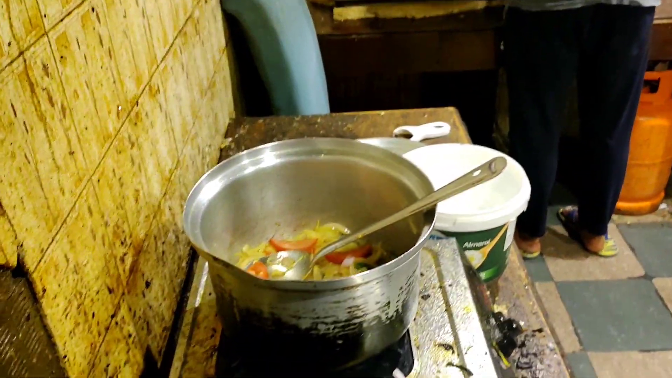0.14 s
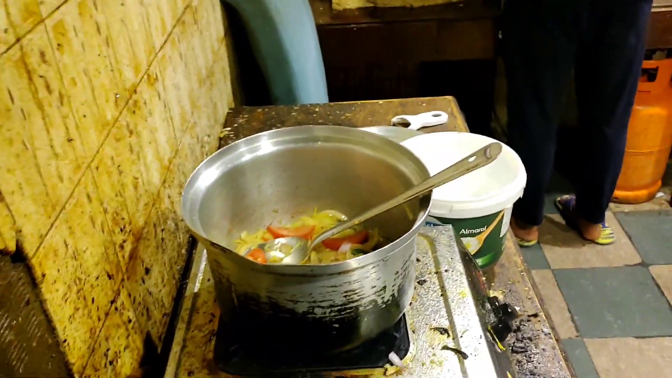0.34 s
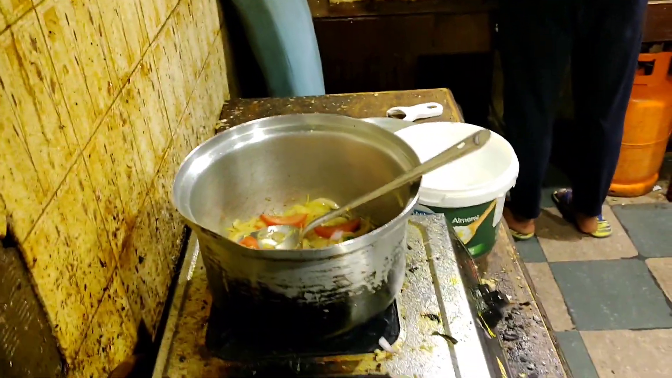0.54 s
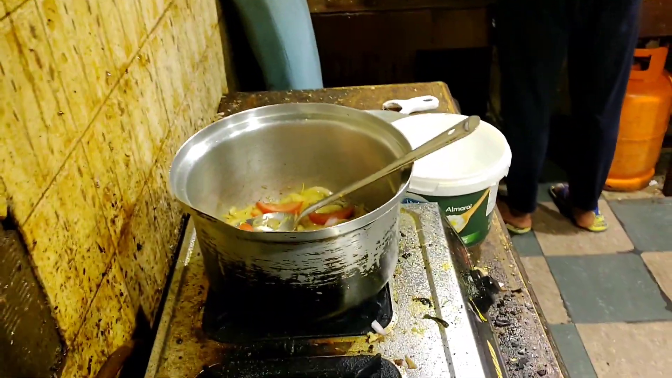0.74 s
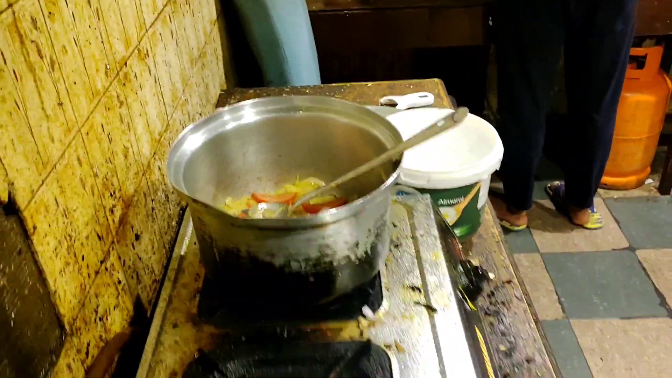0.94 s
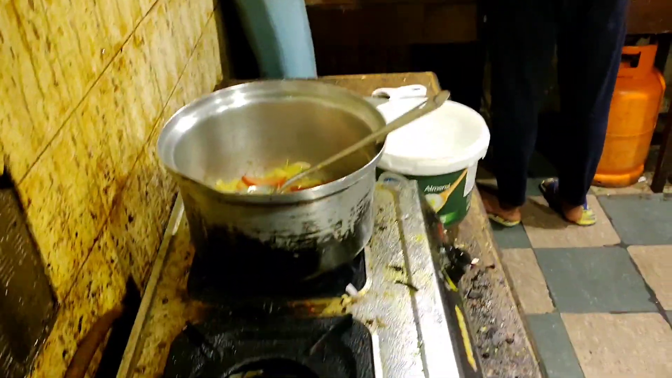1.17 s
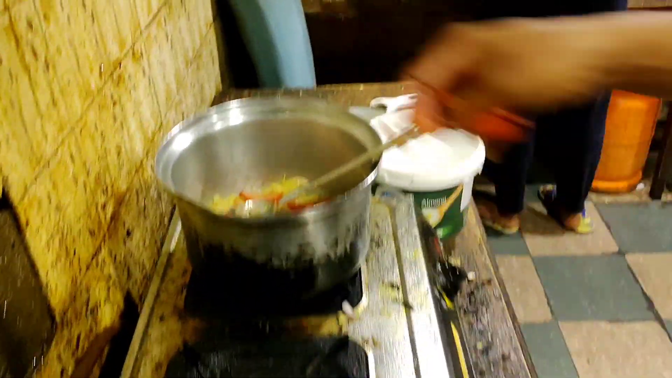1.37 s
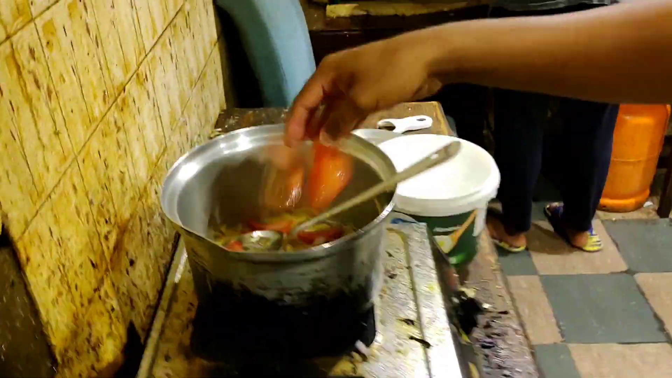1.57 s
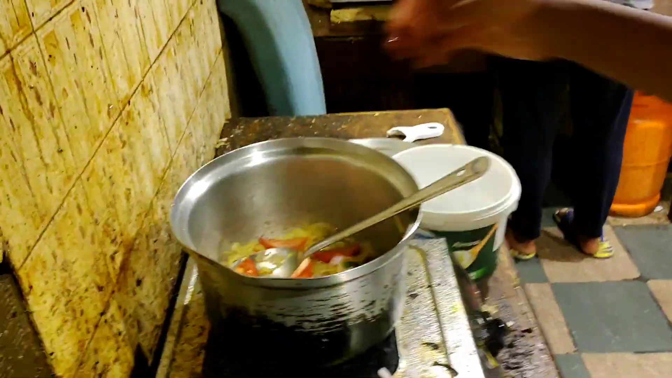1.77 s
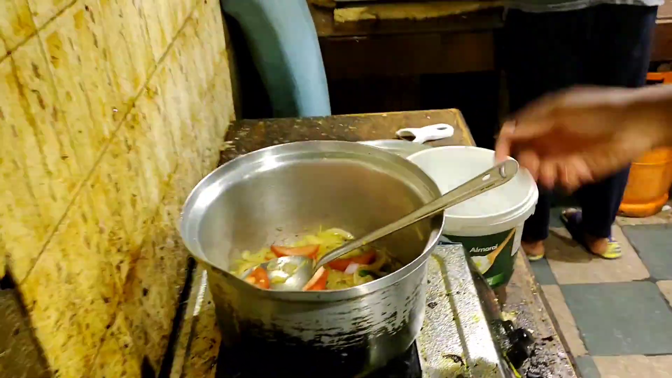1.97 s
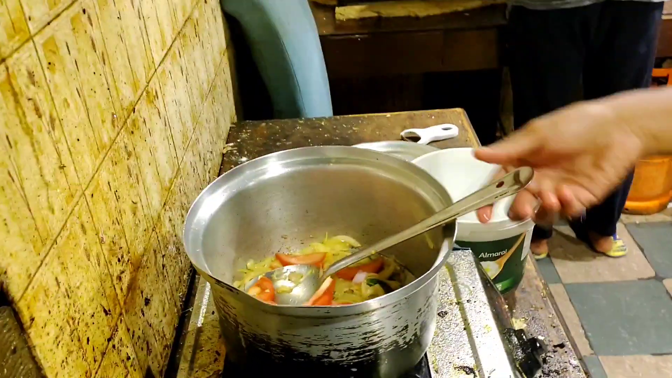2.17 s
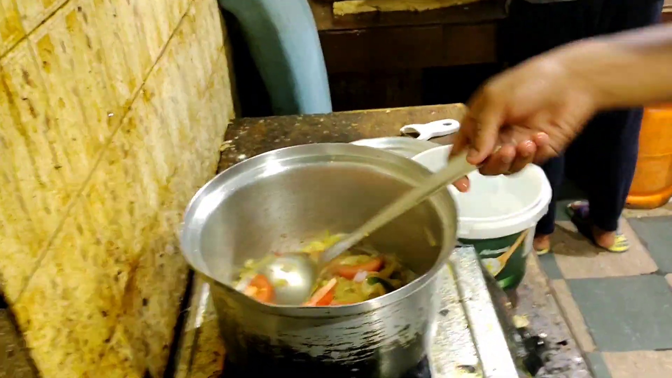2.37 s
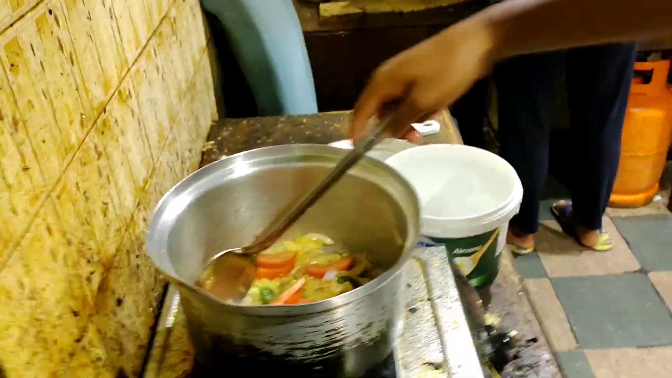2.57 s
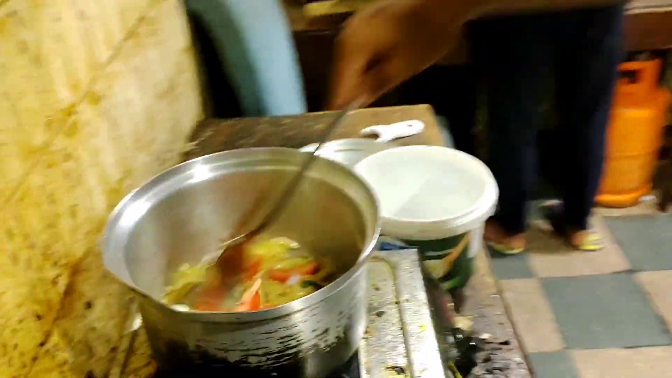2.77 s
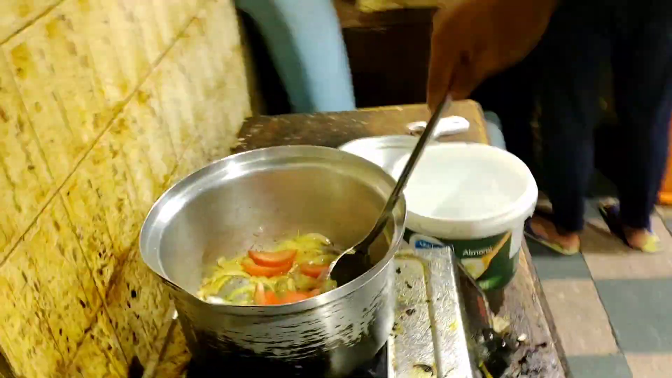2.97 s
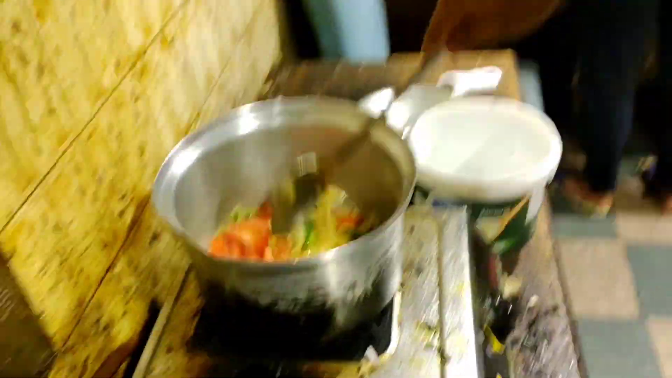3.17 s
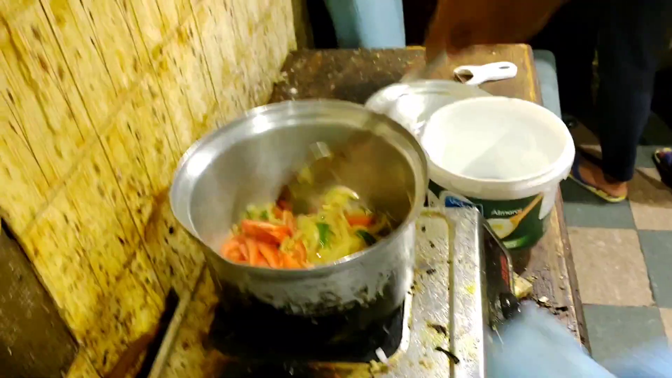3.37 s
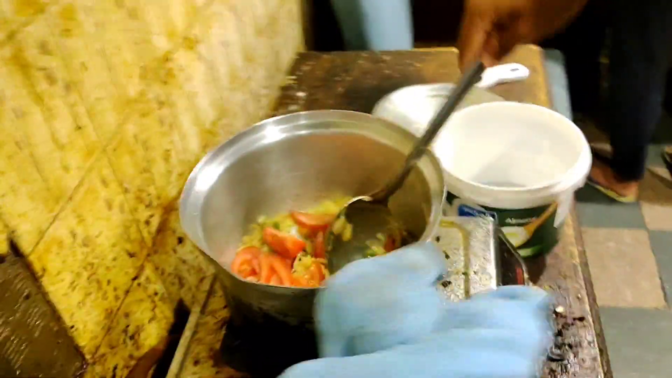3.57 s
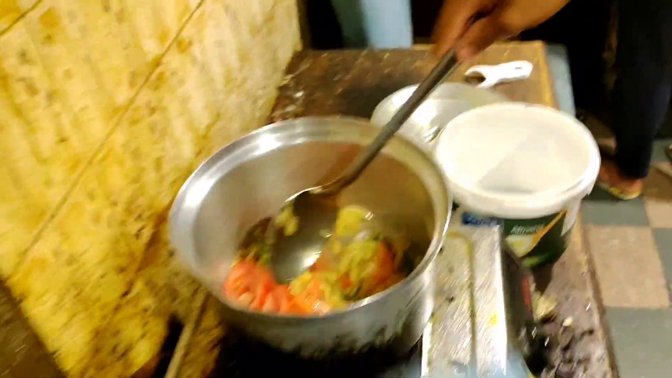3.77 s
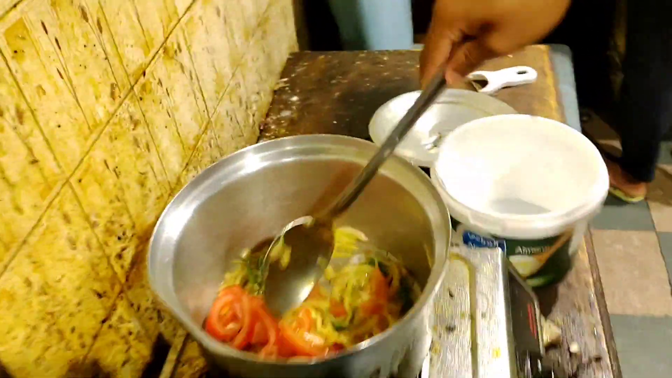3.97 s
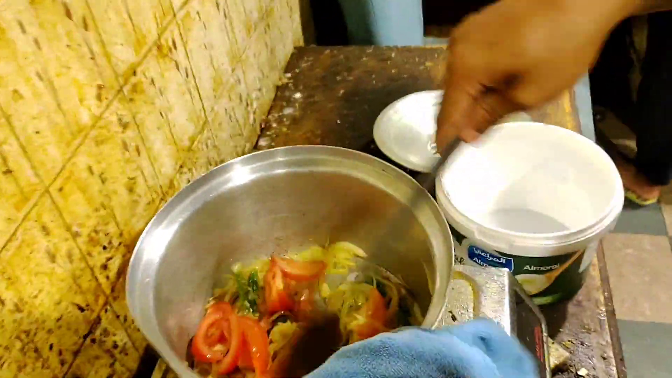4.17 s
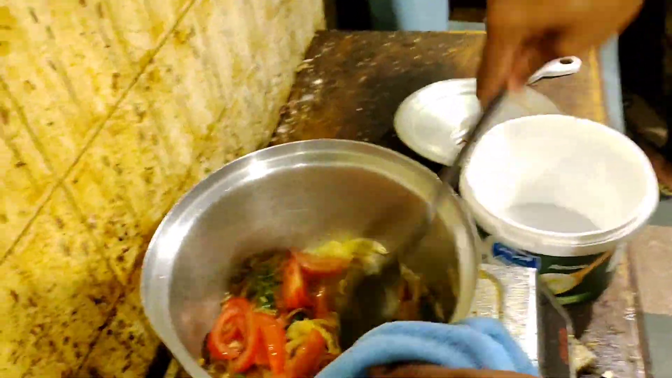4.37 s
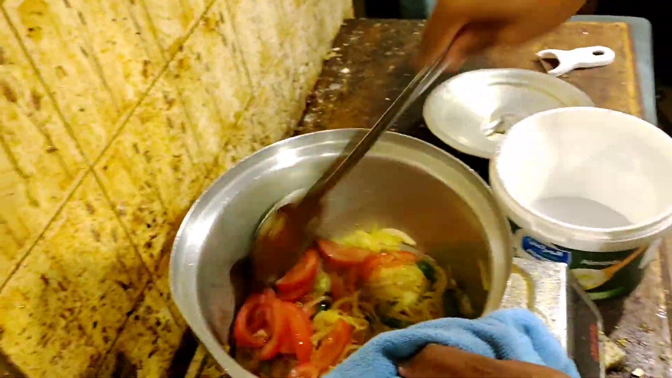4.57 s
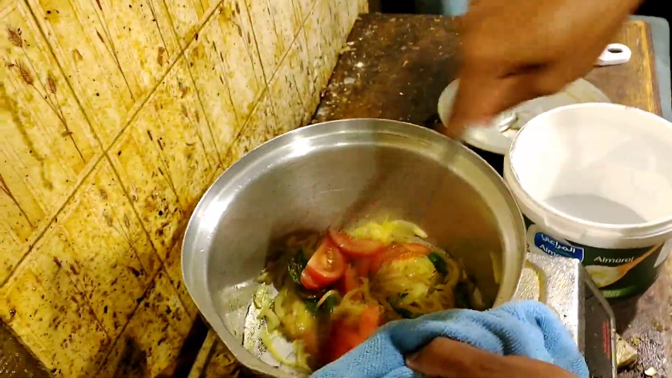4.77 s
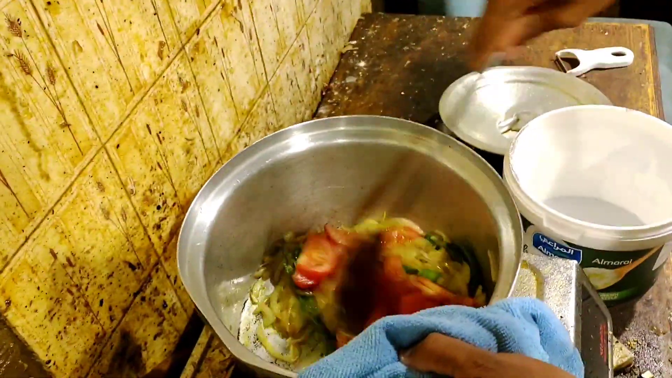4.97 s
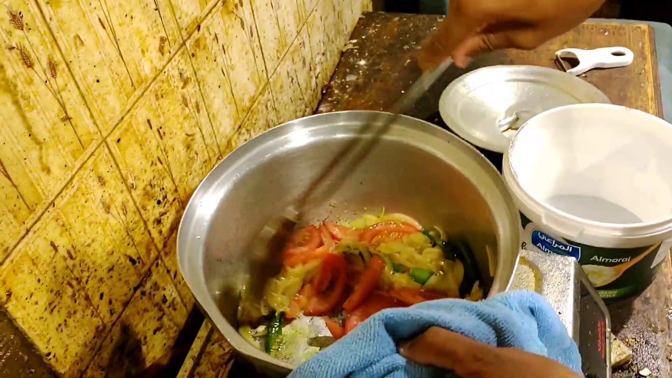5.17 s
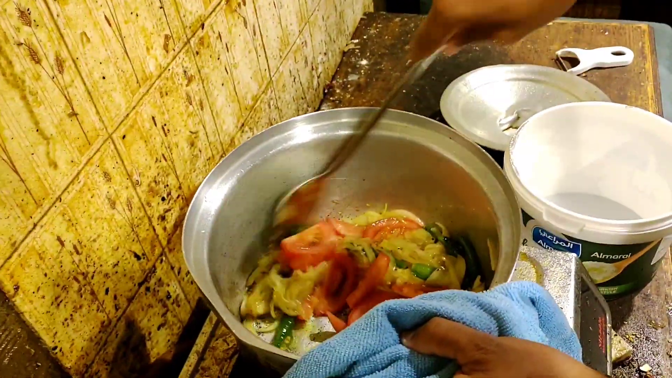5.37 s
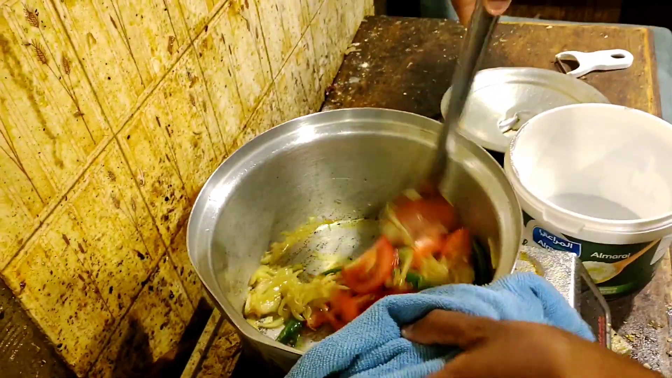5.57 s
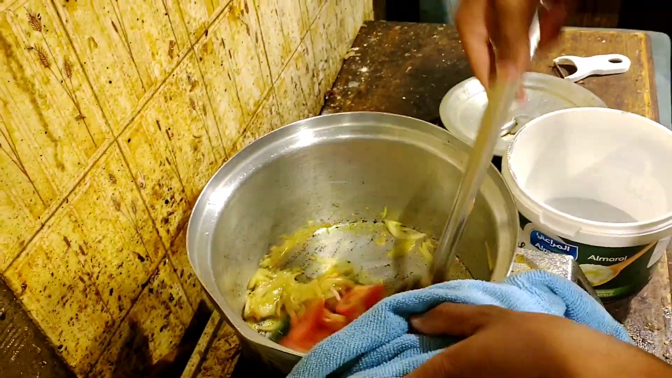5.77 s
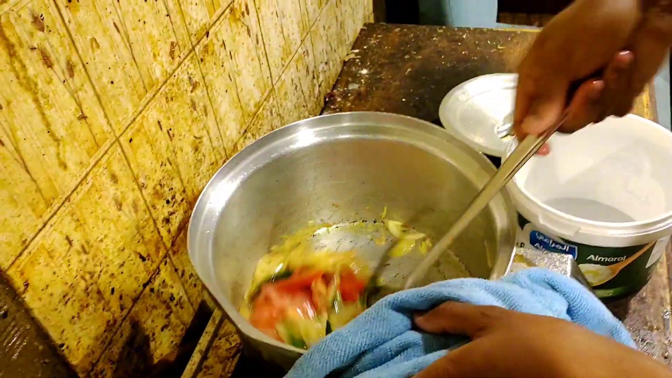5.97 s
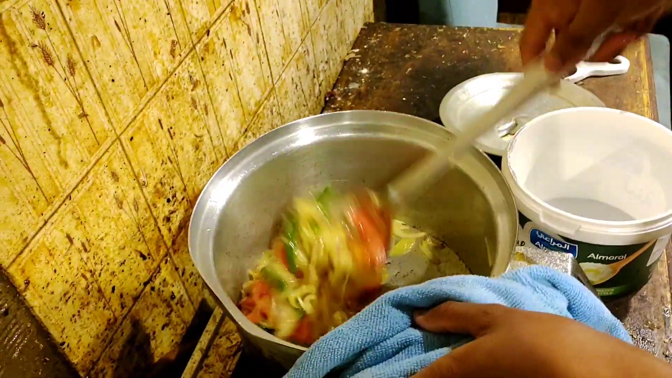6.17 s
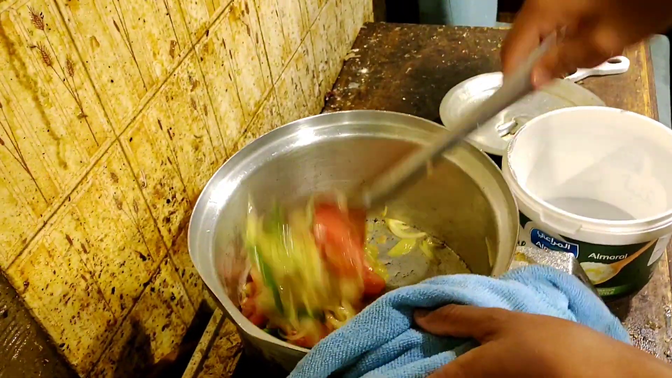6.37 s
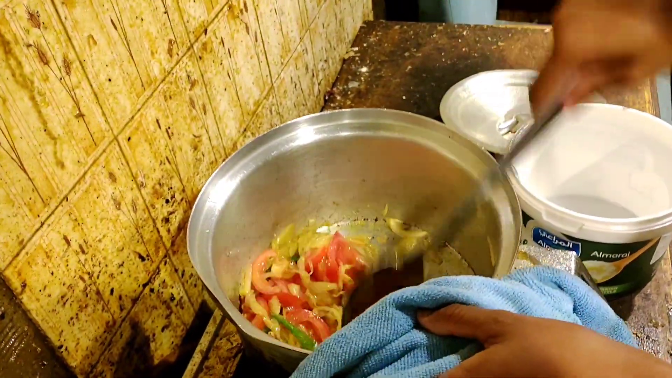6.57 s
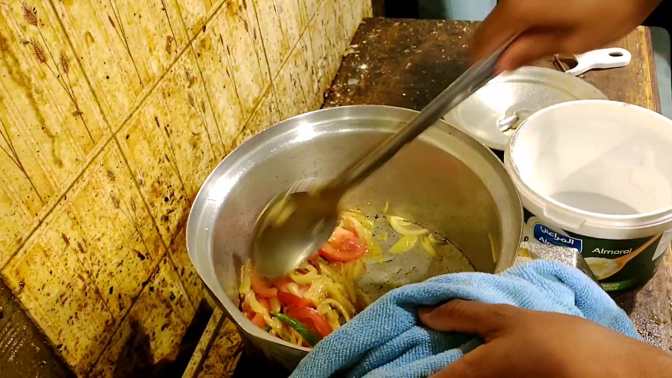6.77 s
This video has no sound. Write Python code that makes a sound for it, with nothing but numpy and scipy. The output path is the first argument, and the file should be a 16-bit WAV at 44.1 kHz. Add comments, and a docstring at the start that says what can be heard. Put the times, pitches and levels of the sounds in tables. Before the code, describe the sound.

Close, bubbly frying with sharp oil spits, then a long metal spoon clanks and scrapes in rhythmic strokes around a ringing aluminium pot.

```python
"""Onions and tomatoes sizzle in oil in a big aluminium pot: random clicks, bubble pings and hiss, with spits of oil.
More pieces drop in; a long metal spoon knocks, scrapes, squeals and ticks, as shaped noise and decaying modes.
The pot rocks on its grate in low bumps; a rumble and two faint hums lie behind, in a small hard-walled kitchen.
The microphone is close; its right port is late and shaded from the treble."""
import sys
import numpy as np
from scipy import signal
from scipy.fft import rfft, irfft, next_fast_len
from scipy.io import wavfile
from scipy.ndimage import uniform_filter1d

SR = 44100
rng = np.random.default_rng(int(sys.argv[2]) if len(sys.argv) > 2 else 0)


def int16_out(signal):
    """Quantize to a 16-bit WAV file."""
    q = np.round(np.clip(np.atleast_2d(signal).T, -1, 1) * 32767)
    wavfile.write(sys.argv[1], SR, q.astype(np.int16))


N = 300762
T = np.arange(N) / SR  # s

# levels below are before the trims in the functions
# background spectrum: f/Hz, density/dB per Hz
BACKGROUND_COLOUR = [(20, -11), (45, -7), (70, -1), (84, -14), (98, 5.5), (122, 3.5), (200, -12),
                     (400, -6.5), (1000, -6), (3000, -39)]
# room decay: f/Hz, t60/s
ROOM_DECAY = [(150, 0.52), (600, 0.54), (2500, 0.38), (8000, 0.045), (16000, 0.4)]
# port shading: f/Hz, left over right/dB
PORT_SHADE = [(60, -3), (200, 0.5), (380, 4), (600, 5), (1290, 3.5), (2380, 5.5), (4400, 12.5), (8100, 21),
              (15000, 22)]
# pot rocking on its burner grate: t/s, first bump level/dB, f/Hz, run length/s
ROCKING_RUNS = [(1.083, -37, 70.5, 0.02), (1.765, -35, 91, 0.1), (2.377, -24, 156, 0.12),
                (2.614, -28, 234.5, 0.33), (3.521, -27, 249, 0.06), (5.47, -29, 170, 0.02)]
# spoon ticks on the rim: t/s, level/dB
RIM_TICKS = [(2.2558, -17.5), (2.3037, -20), (3.3127, -15.5), (3.4145, -17), (5.438, -16.5), (6.208, -19),
             (6.222, -15.5), (6.2984, -21.5), (6.4625, -19)]
# spoon modes: f/Hz, level re tick/dB, t60/s
SPOON_MODES = [(3300, -21.5, 0.068), (3655, -20, 0.12), (4105, -22.5, 0.28)]
# spoon sings where its edge catches: t/s, level/dB, f/Hz, length/s
EDGE_SQUEAKS = [(1.642, -31.5, 2553, 0.08), (1.643, -37, 2790, 0.047), (1.665, -36, 1495, 0.18),
                (2.360, -28, 1528, 0.084), (2.637, -39, 1680, 0.088), (2.826, -37, 2570, 0.02),
                (2.838, -27.5, 1497, 0.06), (4.028, -38.5, 1112, 0.19), (4.036, -39, 705, 0.064),
                (4.107, -34, 1579, 0.17), (4.401, -35, 1810, 0.079), (5.107, -23.5, 1528, 0.026)]
# pot modes: f/Hz, struck level/dB, scraped level/dB, free t60/s
POT_MODES = [(273.8, -5, -28, 0.7), (360.5, 3.5, -10, 0.74), (615, -6, 4, 0.43), (712, -5, -31, 0.17),
             (976, -12.5, 3, 0.9), (1089, -5, 0.5, 0.66), (1168, 5.5, 6, 0.36), (1270, -37, -9, 0.28),
             (1441, -48, 13, 0.083), (1494, 4, 11, 0.19), (1670, -40, -22, 0.12), (1810, 1.5, -45, 0.093),
             (1978, -22, -3, 0.47), (2226, 3.5, -8.5, 0.22), (2537, -5, 6, 0.27), (2590, -3, 1, 0.16),
             (2860, -31, -11, 0.17), (3134, -24, -14, 0.64), (3060, -18, 3.5, 0.21), (3380, -18, 0, 0.11),
             (4020, -20, 7, 0.6), (4520, -20, 22, 0.25), (5070, -24, -14, 0.31)]
# blows on the pot: t/s, level/dB, centre f/Hz, thud level/dB,
# hardness/dB (low = cushioned by food), chatter length/s
POT_BLOWS = [(1.262, -28.5, 580, -17.5, -16, 0.061), (1.267, -32, 1340, -33, -29, 0.063),
             (1.561, -42, 1144, -44, -8, 0.022), (1.639, -31.5, 664, -39, 1.5, 0.034),
             (1.665, -25.5, 1090, -41, -21, 0.022), (1.837, -33.5, 563, -26, -6.5, 0.055),
             (2.336, -22, 734, -23.5, -0.5, 0.039), (2.358, -26.5, 1140, -12.5, -3.5, 0.063),
             (2.624, -38, 670, 3.5, -19, 0.078), (2.826, -29, 355, -5, -6.5, 0.027),
             (3.416, -39, 1070, -16, 6.5, 0.018), (3.430, -24, 1180, -23, -2, 0.041),
             (3.504, -20.5, 1140, -14, -4, 0.039), (4.014, -39, 517, -7, -3.5, 0.022),
             (4.39, -18.5, 1100, -25.5, -11, 0.0042), (4.67, -24, 467, -16, -10.5, 0.0074),
             (4.821, -34.5, 464, -6, -18, 0.019), (5.218, -21, 440, -14, -22, 0.0051),
             (5.434, -22.5, 663, -20.5, -6.5, 0.019), (5.464, -40.5, 534, -15, -2, 0.068),
             (5.599, -36.5, 394, -20, -5.5, 0.11), (5.838, -25, 955, -16.5, -9, 0.037),
             (6.207, -37.5, 1030, -18, 3.5, 0.069), (6.713, -29.5, 450, -30, -12, 0.034)]
# spoon strokes over the base: peak t/s, rise/s, fall/s, pressure level/dB, grit level re pressure/dB,
# stirred-up fizz level/dB, squeal f/Hz, upper squeal f/Hz, squeal level/dB, upper squeal level/dB
SPOON_STROKES = [(3.065, 0.25, 0.12, -24.5, 2.5, -38, 1520, 2623, -25.5, -35),
                 (3.666, 0.22, 0.18, -24.5, -4.5, -37.5, 1537, 3300, -23, -33.5),
                 (4.256, 0.16, 0.17, -27, 3, -30.5, 1553, 3180, -25, -31),
                 (5.195, 0.16, 0.19, -22, 4.5, -31.5, 1510, 2638, -27, -28),
                 (5.789, 0.41, 0.31, -30, -0.5, -34.5, 1463, 3070, -36.5, -44),
                 (6.27, 0.21, 0.39, -42.5, -8, -57, 1596, 3200, -51, -59),
                 (6.77, 0.08, 0.18, -49, -5, -44, 1480, 3250, -44, -43)]
# slip force spectrum: f/Hz, level/dB
SLIP_COLOUR = [(200, -43.5), (380, 6.5), (800, -19), (1100, 3), (1550, -3), (1900, 4), (3100, 5.5),
               (4200, -12), (9000, -12)]
# gritty hiss spectrum: f/Hz, level/dB
GRIT_HISS_COLOUR = [(2000, -55), (3200, 1), (4300, 3), (5000, 11), (6500, 8), (8300, 4), (10000, -17),
                    (16000, -76)]
# largest spits of oil: t/s, level/dB, centre f/Hz
OIL_SPITS = [(0.1496, -11.5, 9450), (0.505, -18, 14300), (0.525, -16.5, 7050), (1.0425, -17, 14100),
             (1.5677, -15.5, 6340), (4.3916, -13.5, 7560), (4.865, -13, 12800), (5.0535, -18, 5800)]
# steady frying: t/s, fine fizz level/dB, wet crackle level re fizz/dB
STEADY_FRYING = [(0, -33.5, -8), (0.32, -37.5, 2.5), (0.95, -37.5, 3), (1.5, -38, 3.5), (2.05, -40, 3.5),
                 (2.23, -43.5, 7.5), (2.52, -37, 3), (2.9, -41.5, 3), (3.2, -39.5, 5), (3.429, -44, 2.5),
                 (3.8, -35, 2.5), (4.0, -39, 1), (4.68, -40, 8), (5.4, -43, 9.5), (6.1, -37, 2),
                 (6.55, -42.5, 6.5), (6.82, -39, 10.5)]
# wet food meets hot metal: peak t/s, rise/s, fall/s, fizz level/dB, wet crackle level re fizz/dB
SIZZLE_FLARES = [(0.04, 0.1, 0.12, -36.5, 6.5), (0.63, 0.21, 0.18, -30.5, 0.5),
                 (1.17, 0.051, 0.098, -33.5, -24), (1.585, 0.018, 0.27, -38.5, 7),
                 (2.36, 0.05, 0.062, -32.5, 2.5), (3.32, 0.024, 0.073, -36.5, 2),
                 (3.511, 0.008, 0.02, -34.5, 9.5), (4.399, 0.016, 0.09, -30.5, 4),
                 (4.55, 0.064, 0.05, -33, 2.5), (4.868, 0.059, 0.11, -33.5, 12),
                 (5.88, 0.089, 0.081, -34, 3.5), (6.225, 0.014, 0.18, -35, -7)]
# frying spectrum: f/Hz, density/dB per Hz
FRYING_COLOUR = [(250, -47), (400, -15), (520, 3.5), (800, -15), (1150, -4), (1800, -2), (2600, -3.5),
                 (3600, 1), (5100, 4.5), (6000, -0.5), (7400, 1.5), (11000, -5), (14000, -3.5),
                 (16000, -10)]
# air resonances in the open pot: f/Hz, width/Hz, level/dB
POT_AIR_MODES = [(489, 40, 1.5), (1104, 64, 0.5), (1740, 440, -6)]

EDGE_HZ = 16100  # band limit
PORT_DELAY_S = 0.00022
TICK_HZ = 3950
BUMP_GAP_S, BUMP_FADE_DB_PER_S, BUMP_SCATTER_OCTAVES = 0.064, 14, 0.48
SQUEAL_WIDTH_HZ = 29  # resonance fed by the slips
SQUEAL_SAG_OCTAVES_PER_S = 0.25  # squeal sinks as the spoon crosses the base
# arch drop over one rise or fall time; shape 1 = pointed top, 2 = round top
STROKE_DROP_DB, STROKE_SHAPE = 29, 1.5
FLARE_DROP_DB, FLARE_SHAPE = 14.5, 1.34
SPRAY_DB, SPRAY_FALL_S = -23, 0.024  # fizz after a spit, re its table level


def amp(db):
    """Gain from dB."""
    return 10 ** (np.asarray(db) / 20)


def evened(x):
    """Scale to unit RMS."""
    return x / np.sqrt(np.mean(x ** 2) + 1e-20)


def read(points, hz):
    """Read a curve over log frequency."""
    f, value = np.transpose(points)
    return np.interp(np.log(hz + 1), np.log(f + 1), value)


def add(mix, s, sound):
    """Add a sound in place at s seconds."""
    part = mix[round(s * SR):][:len(sound)]
    part += sound[:len(part)]


def band(x, lo_hz, hi_hz, order=2):
    """Butterworth band-pass."""
    edges_hz = [lo_hz, min(hi_hz, .49 * SR)]
    return signal.sosfilt(signal.butter(order, edges_hz, "band", fs=SR, output="sos"), x)


def colour(x, points):
    """Shape the spectrum by a dB curve."""
    size = next_fast_len(N + 4096)
    gain = amp(read(points, np.fft.rfftfreq(size, 1 / SR)))
    return irfft(rfft(x, size) * gain, size)[..., :N]


def through(x, response):
    """Convolve with a two-port response."""
    return signal.fftconvolve(np.atleast_2d(x), response, axes=1)[:, :N]


def clicks(per_s, spread_db, count=N):
    """Random clicks, mostly small and a few large."""
    size = amp(spread_db * np.minimum(rng.exponential(1, count), 4.6))
    sign = rng.choice([-1, 1], count)
    return evened(size * sign * (rng.random(count) < per_s / SR))


def flutter(hz, depth_db):
    """A gain that wanders at random, hz knots a second."""
    knots = rng.standard_normal(4000)
    return amp(depth_db * np.interp(T * hz, np.arange(len(knots)), knots))


def arch(peak_s, rise_s, fall_s, drop_db, shape):
    """A gain that climbs to 1 and sinks, drop_db down one rise before and one fall after its peak."""
    away = np.maximum((peak_s - T) / rise_s, (T - peak_s) / fall_s)
    return amp(-drop_db * np.minimum(abs(away), 10) ** shape)


def drifting(x, respond, count=44):
    """Sources and microphone move: crossfade through newly drawn reflection patterns."""
    hop, out = N // count, np.zeros((2, N))
    for centre in range(0, N + hop, hop):
        n = np.arange(max(centre - hop, 0), min(centre + hop, N))
        piece = x[..., n] * np.cos(np.pi / 2 * (n - centre) / hop)
        for port, sound in zip(out, through(piece, respond())):
            add(port, n[0] / SR, sound)
    return out


def bounces(x, t60, wet_db):
    """Direct sound plus quick reflections in the pot; direct treble is dulled at the right port."""
    t = np.arange(4096) / SR
    click = 1. * (t == 0)
    direct = np.array([click, signal.lfilter(*signal.butter(1, 2200, fs=SR), click)])

    def respond():
        tail = band(rng.standard_normal((2, len(t))) * amp(-60 * t / t60), 1560, 16800, order=1)
        response = direct + amp(wet_db) * tail / np.linalg.norm(tail[0])
        return response / np.linalg.norm(response[0])
    return drifting(x, respond)


def background():
    """A low rumble of shaped noise and two faint wavering hums."""
    shared, own = rng.standard_normal(N), rng.standard_normal((2, N))
    rumble = evened(colour(shared + 0.52 * own, BACKGROUND_COLOUR))
    upper_hum = evened(np.sin(2 * np.pi * 119 * T) * flutter(hz=5, depth_db=2))
    lower_hum = evened(np.sin(2 * np.pi * 70.5 * T) * flutter(hz=3.46, depth_db=1.5))
    return amp(-54.5) * rumble + amp(-65) * upper_hum + amp(-62) * lower_hum


def room_tail():
    """Hard-wall reverberation, each band dying at its own speed; bass alike at both ports."""
    taps = rng.standard_normal((2, SR // 2)) * (np.arange(SR // 2) > .006 * SR)
    hz, t, z = signal.stft(taps, SR, nperseg=256)
    same = 1 / (1 + (hz[:, None] / 800) ** 2)
    z[1] = same * z[0] + np.sqrt(1 - same ** 2) * z[1]
    decay = amp(-60 * t / read(ROOM_DECAY, hz)[:, None])
    tail = signal.istft(z * decay, SR, nperseg=256)[1]
    return tail / np.linalg.norm(tail[0])


def rocking():
    """The base bumps on the grate in fading, uneven runs: soft, low, quickly damped notes."""
    out, t = np.zeros(N), np.arange(SR // 3) / SR
    u = t / 0.016
    for s, db, hz, length in ROCKING_RUNS:
        for k, (slip, corner) in enumerate(rng.uniform(-1, 1, (12, 2))):
            after = BUMP_GAP_S * (k + 0.305 * slip * (k > 0))
            if after >= length:
                continue
            note = hz * 2 ** (BUMP_SCATTER_OCTAVES * corner)
            judder = evened(band(rng.standard_normal(len(t)), note / 1.36, note * 2.32, order=3))
            bump = u * np.exp(1 - u) * (np.sin(2 * np.pi * note * t) + 0.83 * judder)
            add(out, s + after, amp(db - 10.5 - BUMP_FADE_DB_PER_S * after) * bump)
    return out


def crack(hz, width, decay_s, order):
    """A band-limited noise burst a millisecond or two long, peak 1; width in octaves."""
    t = np.arange(1024) / SR
    noise = rng.standard_normal(len(t)) * t * np.exp(-t / decay_s)
    burst = band(noise, hz * 2 ** (-width / 2), hz * 2 ** (width / 2), order=order)
    return burst / abs(burst).max()


def ticks():
    """The spoon touches the rim: a sharp tick, with the spoon's own faint high ring."""
    out, t = np.zeros(N), np.arange(SR // 3) / SR
    ring = sum(amp(db - 60 * t / t60) * np.sin(2 * np.pi * hz * t) for hz, db, t60 in SPOON_MODES)
    for s, db in RIM_TICKS:
        add(out, s + 0.00103, amp(db) * crack(TICK_HZ, width=0.46, decay_s=0.0006, order=2))
        add(out, s + 0.001005, amp(db) * ring)
    return amp(3.0) * bounces(out, t60=0.3, wet_db=-1.5)


def singing(hz, count=N):
    """Irregular slips feed one narrow resonance; friction evens its strength, leaving a rough tone."""
    keep = np.exp(-np.pi * SQUEAL_WIDTH_HZ / SR)
    noise = rng.standard_normal(count) + 1j * rng.standard_normal(count)
    drift = signal.lfilter([1 - keep], [1, -keep], noise)
    strength = np.sqrt(abs(uniform_filter1d(abs(drift) ** 2, size=700)) / 2 + 1e-12)
    carrier = np.exp(2j * np.pi * np.cumsum(hz * np.ones(count)) / SR)
    return (drift / strength * carrier).real


def squeaks():
    """Each catch of the edge sings with a quick start and fades as the spoon moves on."""
    out, t = np.zeros(N), np.arange(SR // 2) / SR
    for s, db, hz, length in EDGE_SQUEAKS:
        fade = np.minimum(t / 0.004, 1) * np.exp(-(t / length) ** 4)
        add(out, s, amp(db) * singing(hz, count=len(t)) * fade)
    return bounces(out, t60=0.085, wet_db=1)


def pot(levels_db, held=1., scatter_hz=1500):
    """Ringing wall as decaying modes (held < 1 shortens them); higher ones reach the ports out of step."""
    t, out = np.arange(SR) / SR, 0
    for (hz, _, _, t60), db in zip(POT_MODES, levels_db):
        phase = rng.uniform(-1, 1, (2, 1)) * min((hz / scatter_hz) ** 2, np.pi)
        out = out + amp(db - 60 * t / (t60 * held)) * np.sin(2 * np.pi * hz * t + phase)
    return out


def clatter():
    """Each blow rings the modes near its own pitch, under a short chatter of metal and food."""
    dull, left, right = np.zeros((3, N))
    t, ring_t = np.arange(SR // 3) / SR, np.arange(SR) / SR
    mode_hz, mode_db = np.transpose(POT_MODES)[:2]
    for s, db, hz, thud_db, hard_db, length in POT_BLOWS:
        fade = np.minimum(t / 0.00061, 1) * np.exp(-np.maximum(t - length, 0) / (0.0087 + 0.18 * length))
        contacts = clicks(per_s=2500, spread_db=2, count=len(t)) * fade
        body = band(band(contacts, hz / 1.173, hz * 1.045, order=1), 233, 2880)
        thud = band(contacts, 93, 255)
        edge = band(band(contacts, 1900, 2930, order=1), 760, 9700)
        chatter = evened(body) + amp(thud_db) * evened(thud) + amp(hard_db - 1.5) * evened(edge)
        add(dull, s, amp(db) * np.sqrt(np.mean(fade ** 2)) * chatter)

        reach_db = -6 * abs(np.log2(mode_hz / hz))
        reach_db = np.where(mode_hz < 400, thud_db + 8.5, reach_db)  # only a heavy thud moves the lowest modes
        held = np.interp(s, [2.4, 2.9], [1.0, .5])  # shorter once the spoon leans on the pot
        onset = 1 - np.exp(-ring_t / (0.00026 + 0.1 * length))
        ring = amp(db + hard_db + 3.5) * pot(mode_db + reach_db, held) * onset
        add(left, s, ring[0])
        add(right, s, ring[1])
    return bounces(dull, t60=0.061, wet_db=6.5) + np.array([left, right])


def scraping():
    """The edge sticks and slips over the base: slips ring the pot, hiss grittily and squeal under pressure."""
    pressure, grit, squeal = np.zeros((3, N))
    for peak, rise, fall, db, grit_db, _, squeal_hz, upper_hz, squeal_db, upper_db in SPOON_STROKES:
        push = arch(peak, rise, fall, STROKE_DROP_DB, STROKE_SHAPE)
        pressure += amp(db) * push
        grit += amp(db + grit_db) * push
        sag = 2 ** (-SQUEAL_SAG_OCTAVES_PER_S * (T - peak))
        squeal += push * amp(squeal_db) * singing(squeal_hz * sag)
        squeal += push * amp(upper_db) * singing(upper_hz * sag)
    slips = clicks(per_s=5400, spread_db=2.9) * flutter(hz=94.8, depth_db=2.0)
    force = evened(colour(slips, SLIP_COLOUR)) * pressure
    wall = pot([row[2] for row in POT_MODES], held=.45)  # the pressed spoon damps the wall
    ring = through(force, wall / np.linalg.norm(wall[0]))
    hiss = grit * evened(colour(slips, GRIT_HISS_COLOUR))
    rasp = amp(-11.5) * force + amp(-6.0) * hiss
    return amp(-4.0) * ring + bounces(rasp + squeal, t60=0.038, wet_db=4)


def spits():
    """Single sharp cracks of oil, as short noise bursts."""
    out = np.zeros(N)
    for s, db, hz in OIL_SPITS:
        add(out, s + .001, amp(db + 2) * crack(hz, width=0.4, decay_s=0.0007, order=1))
    return bounces(out, t60=0.08, wet_db=-4)


def pings(per_s, cycles, spread_db, size=400, count=12000):
    """Bubbles that each ring for some cycles at a pitch of their own."""
    at, pitch, keep, q = rng.random((count, 4, 1)).transpose(1, 0, 2)
    hz, n = 1500 * (16000 / 1500) ** (pitch ** .5), np.arange(size)
    turns = hz * n / SR
    gain = amp(spread_db * np.minimum(rng.exponential(1, (count, 1)), 3.5)) * hz ** 0.21
    gain = gain * (keep < per_s * N / SR / count)  # thin to the wanted rate
    grains = gain * np.exp(-turns / (cycles * (1.1 + q))) * np.sin(2 * np.pi * turns)
    return evened(np.bincount(((at * N).astype(int) + n).ravel(), grains.ravel(), N)[:N])


def frying_levels():
    """Gains of fizz and crackle: steady frying plus what flares, strokes and spits stir up, as power sums."""
    s, fizz_db, wet_db = np.transpose(STEADY_FRYING)
    fizz = amp(np.interp(T, s, fizz_db)) ** 2
    wet = amp(np.interp(T, s, fizz_db + wet_db)) ** 2
    for peak, rise, fall, db, crackle_db in SIZZLE_FLARES:
        flare = amp(db) * arch(peak, rise, fall, FLARE_DROP_DB, FLARE_SHAPE)
        fizz += flare ** 2
        wet += (amp(crackle_db) * flare) ** 2
    for peak, rise, fall, _, _, db, *_ in SPOON_STROKES:
        flare = amp(db) * arch(peak, rise, fall, drop_db=13, shape=1.2)
        fizz += flare ** 2
        wet += (amp(3.0) * flare) ** 2
    for s, db, _ in OIL_SPITS:
        spray = arch(s + 0.0071, 0.0014, SPRAY_FALL_S, FLARE_DROP_DB, FLARE_SHAPE)
        fizz += (amp(db + SPRAY_DB) * spray) ** 2
    return np.sqrt(fizz), np.sqrt(wet)


def sizzle():
    """Tiny steam bubbles snap and ping over a smooth hiss; the air in the pot hums along."""
    fizz_gain, wet_gain = frying_levels()
    snaps = sum(band(clicks(per_s=800, spread_db=5.5), hz / 1.046, hz * 1.172, order=1)
                for hz in np.geomspace(1000, 15000, num=7))
    high_snaps = band(clicks(per_s=720, spread_db=4.0), 5300, 12200, order=1)
    bursts = evened(snaps) + amp(-3.0) * evened(high_snaps)
    bursts += amp(1.0) * rng.standard_normal(N)  # smooth hiss
    bursts += amp(-4) * pings(per_s=1100, cycles=10.7, spread_db=5)
    bursts = bounces(bursts * flutter(hz=45.26, depth_db=1), t60=0.031, wet_db=1.5)
    # droplets bursting above the food skip the pot's reflections
    spray = evened(band(clicks(per_s=330, spread_db=4.8), 8000, 20000, order=2))
    bursts = colour(evened(bursts) + amp(-8.5) * spray, FRYING_COLOUR)
    fizz = amp(0.5) * fizz_gain * evened(band(bursts, 10600, 30000, order=3))
    crackle = amp(-4) * wet_gain * evened(band(bursts, 150, 7050, order=3))

    bubbling = clicks(per_s=500, spread_db=1.0) * flutter(hz=14, depth_db=6.0)
    hollow = sum(amp(db) * evened(band(bubbling, hz - width / 2, hz + width / 2, order=1))
                 for hz, width, db in POT_AIR_MODES)
    stirred_db = np.interp(T, [0, 2.2, 4.5, 6.8], [-52, -59.0, -49.0, -47.0])  # stirring wets the hot base
    return fizz + crackle + amp(stirred_db) * hollow


def scene():
    """Sum frying, spoon and pot, their room sound and the background."""
    frying = sizzle() + spits()
    spoon = scraping() + squeaks() + ticks() + clatter() + rocking()
    room = drifting(amp(-9.0) * frying + amp(-7) * spoon, room_tail, count=20)
    return frying + spoon + room + background()


def record(dry):
    """Shade and delay the right port against the left, then limit the band."""
    hz = np.fft.rfftfreq(N, 1 / SR)
    lead = amp(read(PORT_SHADE, hz))
    late = np.exp(-2j * np.pi * hz * PORT_DELAY_S)
    balance = np.array([lead, late]) * 2 / (1 + lead)
    ports = irfft(rfft(dry) * balance, N)
    low_pass = signal.firwin(511, EDGE_HZ, window=("kaiser", 9), fs=SR)
    return signal.oaconvolve(ports, low_pass[None], "same")


dry = scene()
out = record(dry)
int16_out(out)
```